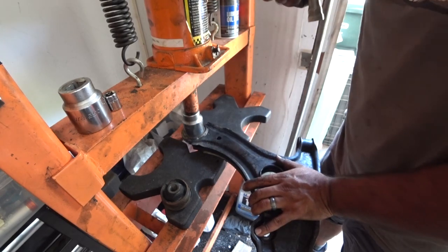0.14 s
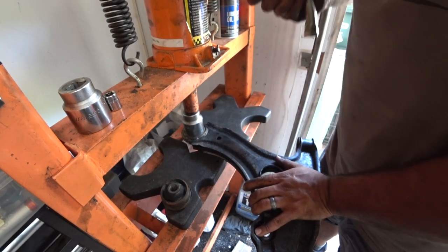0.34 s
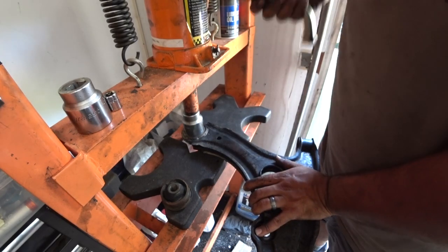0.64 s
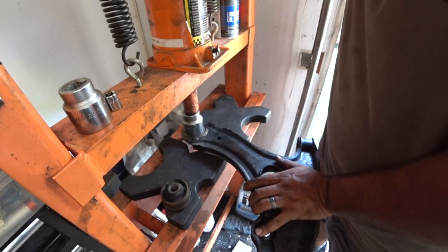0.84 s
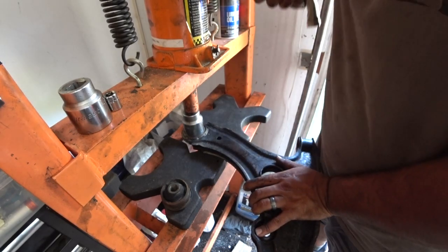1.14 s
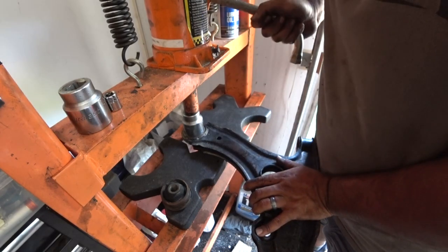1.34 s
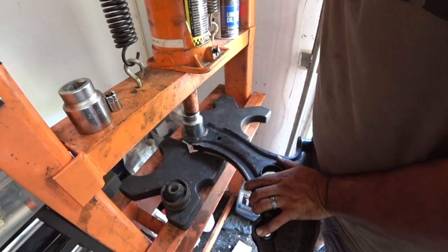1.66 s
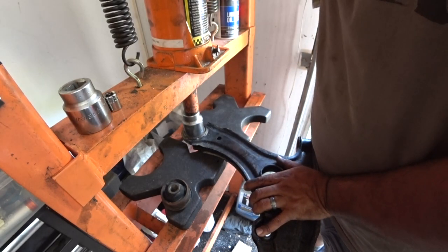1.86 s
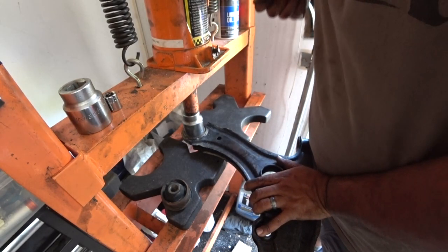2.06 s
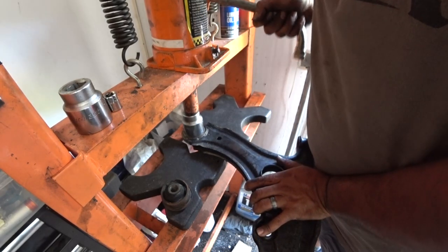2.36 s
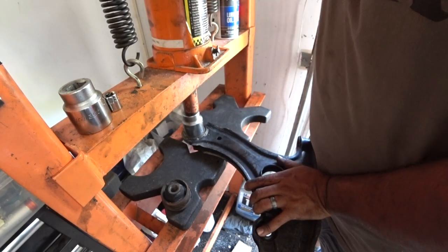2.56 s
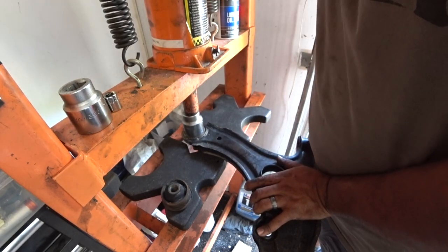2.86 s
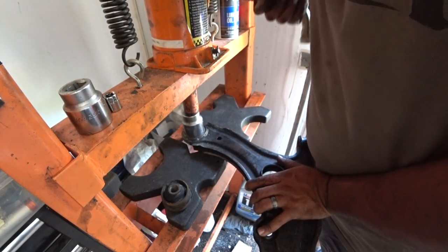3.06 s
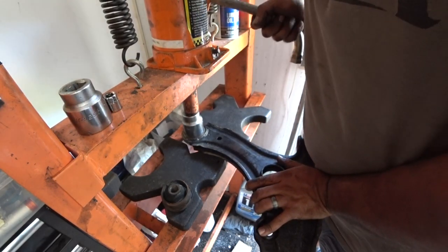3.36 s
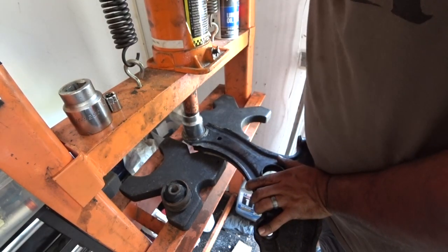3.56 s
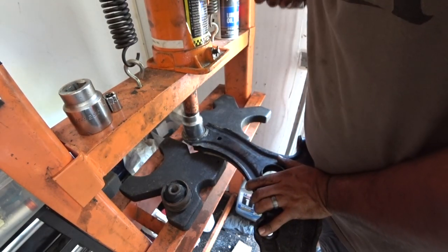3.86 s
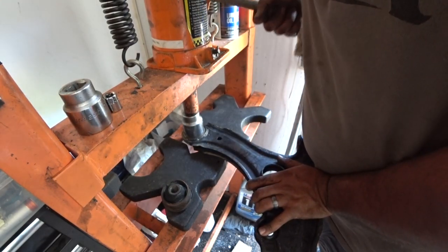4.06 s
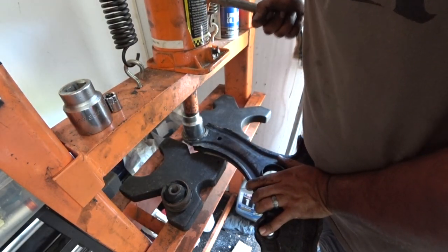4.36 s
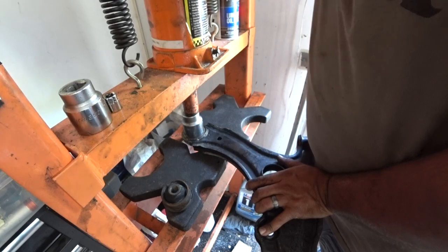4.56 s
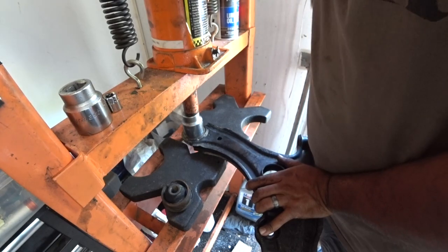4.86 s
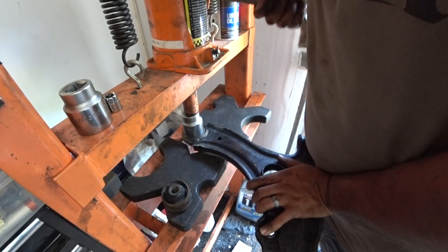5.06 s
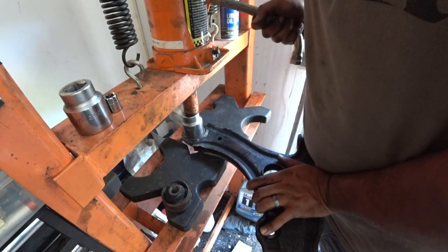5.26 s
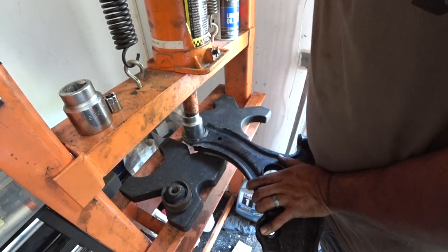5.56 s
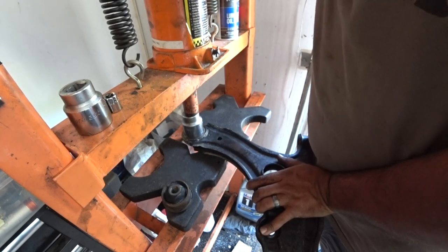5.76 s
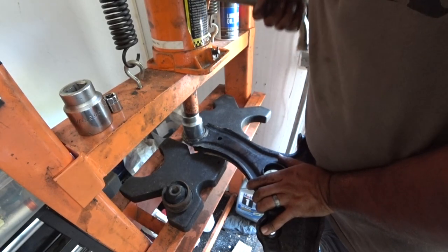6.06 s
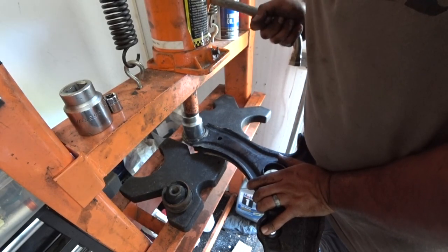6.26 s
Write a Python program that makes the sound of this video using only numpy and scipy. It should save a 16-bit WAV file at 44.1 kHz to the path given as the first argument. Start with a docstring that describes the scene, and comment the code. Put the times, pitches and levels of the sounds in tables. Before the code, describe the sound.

Quick clusters of steel clicks, bright pin snaps and duller lever thuds repeat about once a second over a faint hush, with a short room echo.

```python
"""Quick runs of metal knocks, snaps and light ticks over a quiet hush, with a ringing steel frame and a short echo.
A hand pumps the lever of a hydraulic jack on a steel press; slack in handle, pins and piston closes in knocks.
Each knock is three bands of grainy noise, a pin tone and the tones of the lever; the rattle sets the frame ringing.
Filtered noise makes the low bumps, a sliding scrape and the hush; sparse reflections make the shop's echo."""
import sys
import numpy as np
from scipy import signal
from scipy.fft import rfft, irfft
from scipy.io import wavfile
from scipy.ndimage import uniform_filter1d

SR = 44100
rng = np.random.default_rng(int(sys.argv[2]) if len(sys.argv) > 2 else 0)


def persist_wave(psi):
    """Save psi, clipped to +-1, as 16-bit WAV."""
    counts = np.round(np.clip(psi, -1, 1) * 32767).astype(np.int16)
    wavfile.write(sys.argv[1], SR, np.atleast_2d(counts).T)


N = 282681  # length in samples

# The quiet of the shop. Each row: frequency in Hz, relative level in dB.
HUSH_COLOUR = [(18, -36), (60, -15), (110, -23), (200, -9), (600, -0.5), (1100, 1), (1900, -3), (3300, -7),
               (6200, -8), (11000, -12.5)]
# How the hush changes. Each row: time in seconds, drone level in dB, hush level in dB.
HUSH_LEVELS = [(0, -64, -58), (1.2, -64, -58.5), (3.1, -69.5, -55.5), (4.3, -88, -59), (5.15, -86, -57),
               (6.3, -65, -56.5)]
# How alike left and right are in the hush. Each row: frequency in Hz, likeness (1 = the same).
HUSH_SAME = [(60, 0.8), (200, 0.38), (500, 0.055), (1400, 0.033), (4000, 0.37), (11000, 0.63)]
DRONE_HZ, DRONE_OCTAVES = 1325, 0.11  # a soft, fuzzy drone hangs in the hush

# The echo of the shop. Each row: frequency in Hz, time to fade by 60 dB in seconds.
SHOP_FADE = [(200, 0.61), (600, 0.24), (1500, 0.23), (4000, 0.14), (10000, 0.16)]
SHOP_DB = -8

# The whole press rocks on its feet. Each row: start in seconds, level in dB before the soft onset.
BUMPS = [(0.191, -52.5), (0.992, -49), (1.9, -49.5), (2.791, -43.5), (2.87, -75), (3.519, -55.5),
         (3.777, -50.5), (4.758, -51), (5.539, -63), (5.829, -42)]
BUMP_HZ, BUMP_OCTAVES = 290, 0.43
BUMP_T60, BUMP_RISE = 0.2, 0.02  # seconds: to fade by 60 dB, to rise

# Metal slides on metal as the piston moves. Each row: time in seconds, level in dB.
SLIDE_LEVELS = [(5.56, -66), (5.611, -57), (5.65, -47), (5.69, -47), (5.73, -59), (5.77, -78)]
# The tone of that scrape. Each row: frequency in Hz, relative level in dB.
SLIDE_COLOUR = [(400, -37), (1180, -6.5), (1690, -15), (2530, 3), (3680, -9), (4850, -4.5), (11000, -10)]

# Strong modes of steel frame, springs and jack body.
# Each row: frequency in Hz, relative level in dB, time to fade by 60 dB in seconds.
FRAME_MODES = [(2245, -11, .2), (2966, -15, .5), (3080, -11, .2), (3257, -9, .25), (3390, -10, .2),
               (3455, -10, .25), (3580, -24, .7), (3736, -22, .5), (3890, -14, .2), (4190, -13, .35),
               (4883, -18, .3), (5346, -17, .45), (5631, -24, .9), (6465, -11, .3), (6670, -16, .35),
               (7870, -12, .25), (8430, -21, .7), (8662, -15, .45), (10530, -20, .4)]
FRAME_DB = -17
# Many weak modes of plates and brackets between the strong ones: highest relative level, middle fade in seconds
THICKET_DB, THICKET_T60 = -24.5, 0.42

# In the five tables of contacts below, levels and fade times are starting values that knocks() adjusts.
# Knocks in the linkage. Each row: start in seconds, clack level in dB, thud against it in dB,
# tink against it in dB, pin pitch in Hz, basic rattle fade in seconds.
KNOCKS = [(.103, -45.5, -19, -4, 5500, .07), (.114, -44, -12, -1, 4430, 0.071),
          (.133, -45.5, -6, -15, 6200, .07), (.145, -22.5, -8.5, -12, 5200, 0.048),
          (.19, -22, -2.5, -8, 5830, 0.068), (0.455, -55.5, 0, -2, 3100, .07),
          (.471, -55, -11, -13, 2880, .06), (.572, -49.5, -2, -1.5, 6700, 0.078),
          (.59, -61.5, 14.5, -5, 1890, 0.097), (0.763, -42, 0, -16, 4690, .058),
          (0.93, -31, -15, -25, 4860, 0.06), (0.976, -40.5, 8, 1, 3000, 0.11),
          (.991, -22, -4, -0.5, 4960, 0.08), (1.268, -52.5, 0, -10.5, 1910, .051),
          (1.553, -36, -7.5, -9, 2740, 0.07), (1.589, -45, 12.5, 1.2, 2920, 0.088),
          (1.622, -24, -6, -3.5, 6500, 0.055), (1.666, -28.5, 0.5, 3, 3050, 0.032),
          (1.798, -47, -1, -9, 3340, .063), (1.813, -40.5, -8, -5, 5800, .042),
          (1.827, -37.5, -11, -12, 3150, 0.07), (1.894, -23, -5.5, -3, 3260, 0.077),
          (2.459, -42, -31, -25, 6030, .09), (2.466, -25, -6.5, -2, 3010, 0.067),
          (2.48, -25, -6, 1.5, 6410, 0.11), (2.518, -19, -9, -33, 4100, 0.029),
          (2.724, -21.5, -9.5, -9, 3460, 0.062), (2.752, -35.5, -1, -4, 2880, 0.068),
          (2.767, -22.5, -6.5, -7.5, 3390, 0.084), (2.868, -66, 17.5, -5, 1900, 0.076),
          (3.129, -51.5, -15, -2.2, 6800, 0.095), (3.224, -35.5, -9, 11, 10700, 0.04),
          (3.335, -43.5, -6, -10.5, 3000, 0.034), (3.435, -58, -6, -14, 2400, .1),
          (3.462, -35.5, 3, -13, 3330, 0.09), (3.475, -21.5, -11.5, -7.5, 5980, 0.073),
          (3.517, -36.5, 3, 12, 10500, 0.064), (3.54, -34.5, -5, -3, 2210, 0.051),
          (3.773, -26, -13, -10, 3260, 0.083), (3.797, -45, -12, -2, 10070, 0.071),
          (4.4, -53.5, 6, -31, 1940, 0.056), (4.453, -25.5, -9, -7, 6540, 0.031),
          (4.478, -21, -11, -5, 6440, 0.087), (4.512, -21.5, -7.5, -4, 3800, 0.03),
          (4.659, -53, 4, 1, 5200, 0.11), (4.702, -50.5, 2, 2, 7300, 0.096),
          (4.772, -25, -12.5, -5.5, 3120, 0.082), (5.045, -57, -18, -1.2, 3450, .051),
          (5.276, -49, -11, -2, 2030, 0.061), (5.463, -38, -6.5, -14, 2860, .062),
          (5.52, -24.5, -8.5, -5, 3650, 0.11), (5.539, -29.5, -3, 9, 6570, 0.066),
          (5.557, -26.5, -9.5, -28, 3820, 0.047), (5.808, -28.5, -3, 3, 4930, 0.048),
          (5.819, -17, -6.5, -2.5, 3360, 0.065)]
# The lever meets its stop at the end of each stroke.
# Each row: start in seconds, thud level in dB, clack and pin against the thud in dB.
STOPS = [(1.399, -22, -3.5), (2.256, -22.5, -2), (3.253, -23.5, -1), (4.194, -24.5, -10),
         (5.249, -25.5, -8.5), (6.215, -23.5, -1)]
STOP_PIN_HZ, STOP_T60 = 3590, 0.054  # pin pitch, basic fade in seconds
STOP_TINK_DB, STOP_TINK_SLOPE = -12.5, 1.4  # tink against thud, and dB more per dB of clack against thud
# The pivot pin snaps across its hole. Each row: start in seconds, pin level in dB, pin pitch in Hz,
# thud against the pin in dB, basic rattle fade in seconds.
SNAPS = [(.167, -14, 4550, -28, 0.083), (.702, -21, 4600, -12, 0.06), (.722, -14.5, 5500, -9.5, 0.037),
         (0.7437, -17.5, 3940, -28, 0.03), (0.7482, -9.5, 4680, -24.5, 0.03), (.95, -16, 4590, -21.5, 0.09),
         (1.649, -13.5, 4500, -13, 0.057), (1.861, -16, 4600, -23, 0.074), (3.753, -15, 4615, -17.5, 0.072),
         (4.745, -16, 4760, -19, 0.066), (5.781, -11, 4700, -18.5, 0.049), (5.787, -23, 4200, -10, 0.13)]
SNAP_CLACK_DB, SNAP_TINK_DB = -5, -10  # against the pin
# Slack is taken up in a drawn-out rattle. Each row: start in seconds, clack level in dB,
# brightness in dB (tink up and thud down), pin pitch in Hz.
SLACK = [(0.647, -57, -6, 6470), (.683, -40.5, -5.5, 2850), (.713, -30.5, 3.5, 6370),
         (.915, -43.5, 1, 5800), (1.598, -28, 1, 2990), (1.844, -41.5, -1.5, 7340), (2.443, -46, -5, 2440),
         (2.703, -36, -1, 2780), (3.497, -28, -1, 8300), (3.695, -42.5, 3, 5900), (3.709, -36.5, 3, 3120),
         (3.726, -35.5, -4, 6440), (4.444, -36.5, 3, 2540), (4.463, -33, 8.5, 6450),
         (5.107, -63.5, 18, 6540), (5.495, -39, -2, 2250), (5.762, -44, -8, 3320), (6.003, -55, 9, 5750),
         (6.094, -60, 13.5, 6600)]
SLACK_THUD_DB, SLACK_TINK_DB, SLACK_PIN_DB = -7.5, -4, -4  # against the clack
SLACK_T60 = 0.18  # basic fade in seconds
# Light ticks of springs and hooks. Each row: start in seconds, tink level in dB, pitch in Hz.
TICKS = [(.077, -50, 8200), (.427, -52.5, 6670), (1.188, -47, 5700), (1.197, -41, 6800),
         (1.245, -50.5, 5270), (1.284, -48.5, 6800), (1.439, -43, 6480), (2.045, -51, 6700),
         (2.142, -51, 6840), (2.201, -43.5, 6800), (2.236, -44, 6640), (2.415, -49, 6790),
         (2.965, -45, 5150), (2.981, -48.5, 6800), (3.011, -46, 6960), (3.023, -35.5, 10700),
         (3.065, -40, 6980), (3.119, -38.5, 10500), (3.209, -38, 9960), (3.356, -50, 10190),
         (3.664, -49, 8600), (4.045, -57.5, 6740), (4.099, -52, 8100), (4.215, -39.5, 7700),
         (4.974, -57, 5780), (5.058, -48, 5900)]
TICK_THUD_DB, TICK_CLACK_DB, TICK_PIN_DB = -28, -17, -10  # against the tink
TICK_T60 = 0.077  # basic fade in seconds

# How loud pins ring against the clack in KNOCKS. Each row: frequency in Hz, level in dB.
PIN_LEVEL = [(2000, 6.5), (3000, -2), (5000, -7.5), (6400, -2), (10000, 6)]
# How long pins ring for their rattle. Each row: frequency in Hz, fade-time factor.
PIN_RING = [(2000, 0.66), (4600, 0.71), (5900, 1.7), (6450, 2.44), (6900, 1.2), (10000, 1.16)]
# The tone of a thud. Each row: frequency in Hz, relative level in dB.
THUD_COLOUR = [(30, -37), (150, -33.5), (300, -20), (550, -7), (900, -6), (1200, 0), (1520, -17),
               (1800, -9.5), (2400, -18), (4000, -52)]
CLACK_BAND, TINK_BAND = (3290, 0.65), (8260, 0.7)  # centre in Hz, width in octaves
# Thud, clack and tink in that order. Each row: fade-time factor, rise in seconds.
PARTS = [(1.92, 0.005), (1.25, 0.0011), (1.295, 0.00086)]
# The lever and its socket, rung by the thud of each knock. Each row: frequency in Hz, relative level
# after a dull knock in dB, the same after a bright knock in dB, time to fade by 60 dB in seconds.
LEVER_MODES = [(619, -24, -20, .5), (822, -9, -11, .13), (985, -14, -13, .28), (1071, -14, -15, .2),
               (1170, -11, -7, .13), (1273, -21, -11, .5), (1357, -6, -12, .3), (1385, -6, -11, .33),
               (1483, -9, -9, .1), (1565, 3, -11, .15), (1640, 1, -9, .07), (1816, -19, -12, .45)]
LEVER_DB, LEVER_SPREAD_DB = -9, 2.2  # level against the thud, random spread of each mode

# How the jack sits between the ears. Each row: frequency in Hz, left minus right in dB,
# left lead in radians.
LEAN = [(300, -.4, .25), (2000, -.5, .35), (5000, -1.5, .1), (10000, -1.9, .1)]
BEND = 0.03  # the microphone is slightly lopsided
CEILING = 1.5  # and rounds off the loudest peaks
EDGE_HZ = 11030  # top of the band


def gain_of(db):
    """Turns decibels into gain."""
    return 10 ** (np.asarray(db) / 20)


def evened(x):
    """Scales a sound to an average (rms) level of 1."""
    return x / np.sqrt(np.mean(x ** 2) + 1e-20)


def read(points, hz):
    """Reads between table rows on a log-frequency axis."""
    f, value = np.transpose(points)
    return np.interp(np.log(hz + 1), np.log(f + 1), value)


def coloured(x, db_points):
    """Shapes the spectrum of x along its last axis."""
    hz = np.fft.rfftfreq(x.shape[-1], 1 / SR)
    return irfft(rfft(x) * gain_of(read(db_points, hz)), x.shape[-1])


def bell(hz, centre_hz, octaves):
    """A smooth band on a log-frequency axis."""
    return np.exp(-.5 * (np.log2((hz + 1) / centre_hz) / octaves) ** 2)


def hush():
    """The quiet of the shop: random short-time spectra with faint drifting patches."""
    frames, hz = N // 256 + 5, np.fft.rfftfreq(1024, 1 / SR)
    a, b, c, d, patches = rng.standard_normal((frames, 513, 5)).T
    patches = uniform_filter1d(patches, size=14, axis=0)
    patches = evened(uniform_filter1d(patches, size=12, axis=1))
    same = np.clip(read(HUSH_SAME, hz), -1, 1)[:, None]
    left, other = a + 1j * b, c + 1j * d
    right = same * left + np.sqrt(1 - same ** 2) * other
    spectra = np.array([left, right]) * gain_of(read(HUSH_COLOUR, hz)[:, None] + 2.2 * patches)

    s, *level_db = np.transpose(HUSH_LEVELS)
    bands = (bell(hz, DRONE_HZ, DRONE_OCTAVES)[:, None], 1)  # drone, then the whole hush
    out = np.zeros((2, N))
    for db, band in zip(level_db, bands):
        sound = signal.istft(spectra * band, nperseg=1024, noverlap=768)[1][:, :N]
        out += gain_of(np.interp(np.arange(N) / SR, s, db)) * evened(sound)
    return out


def shop(x):
    """The echo: sparse reflections of random sign, each band dying at its own speed."""
    taps = np.zeros((2, SR // 2))
    # one reflection at a random place in every 20 samples
    at = np.arange(120, SR // 2 - 20, 20) + rng.integers(0, 20, (2, (SR // 2 - 121) // 20))
    np.put_along_axis(taps, at, rng.choice([-1., 1.], at.shape), 1)
    taps[1] = .25 * taps[0] + .95 * taps[1]  # close microphones share part of the echo
    hz, t, spectra = signal.stft(taps, SR, nperseg=256)
    fade = gain_of(-60 * t / read(SHOP_FADE, hz)[:, None])
    tail = signal.istft(spectra * fade, SR, nperseg=256)[1]
    tail /= np.linalg.norm(tail, axis=1, keepdims=True)
    return gain_of(SHOP_DB) * signal.fftconvolve(x[None], tail, axes=1)[:, :N]


def bumps():
    """Low, dull shudders of the frame against the floor: low noise that swells and fades."""
    t, hz = np.arange(N) / SR, np.fft.rfftfreq(N, 1 / SR)
    low = irfft(rfft(rng.standard_normal(N)) * bell(hz, BUMP_HZ, BUMP_OCTAVES), N)
    swell = np.zeros(N)
    for s, db in BUMPS:
        since = np.maximum(t - s, 0)
        swell += gain_of(db - 60 * since / BUMP_T60) * (1 - np.exp(-since / BUMP_RISE))
    return evened(low) * swell


def slide():
    """Metal slides on metal: a short gritty scrape of unevenly strong noise."""
    s, db = np.transpose(SLIDE_LEVELS)
    uneven = evened(uniform_filter1d(rng.standard_normal(N), size=80))
    grit = rng.standard_normal(N) * gain_of(0.99 * uneven)
    level = gain_of(np.interp(np.arange(N) / SR, s, db, -140, -140))
    return level * evened(coloured(grit, SLIDE_COLOUR))


def frame(x):
    """The rattle shakes the steel, whose modes ring on; each microphone hears them at its own phase."""
    t, luck = np.arange(SR) / SR, rng.random((170, 3))
    thicket = [(1900 * 9.4 ** a, THICKET_DB - 8 * b, THICKET_T60 * (.5 + c)) for a, b, c in luck]
    modes = FRAME_MODES + thicket
    # phases in turns: mostly shared by both sides
    turns = rng.random((len(modes), 1)) + 0.078 * rng.standard_normal((len(modes), 2))
    ring = np.zeros((2, SR))
    for (hz, db, t60), turn in zip(modes, turns):
        ring += gain_of(db - 60 * t / t60) * np.sin(2 * np.pi * (hz * t + turn[:, None]))
    ring /= np.linalg.norm(ring[0])
    return gain_of(FRAME_DB) * signal.fftconvolve(x[None], ring, axes=1)[:, :N]


def blows():
    """Lists every contact: start s, thud dB, clack dB, tink dB, pin pitch Hz, pin dB, basic fade s."""
    out = []
    for s, db, sharp in STOPS:
        tink_db = db + STOP_TINK_DB + STOP_TINK_SLOPE * sharp
        out.append((s, db, db + sharp, tink_db, STOP_PIN_HZ, db + sharp, STOP_T60))
    for s, db, hz, thud, t60 in SNAPS:
        out.append((s, db + thud, db + SNAP_CLACK_DB, db + SNAP_TINK_DB, hz, db, t60))
    for s, db, thud, tink, hz, t60 in KNOCKS:
        out.append((s, db + thud, db, db + tink, hz, db + read(PIN_LEVEL, hz), t60))
    for s, db, bright, hz in SLACK:
        thud_db, tink_db = db + SLACK_THUD_DB - bright, db + SLACK_TINK_DB + bright
        out.append((s, thud_db, db, tink_db, hz, db + SLACK_PIN_DB, SLACK_T60))
    for s, db, hz in TICKS:
        out.append((s, db + TICK_THUD_DB, db + TICK_CLACK_DB, db, hz, db + TICK_PIN_DB, TICK_T60))
    return out


def knocks():
    """Each contact: three bands of grainy rattle, the short ring of one pin and the tones of the lever."""
    size = 16384  # samples of lever ring; rattle and pin take half of it
    t, hz = np.arange(size) / SR, np.fft.rfftfreq(size // 2, 1 / SR)
    rattle, rings = np.zeros((2, N + size))
    colours = [gain_of(read(THUD_COLOUR, hz)), bell(hz, *CLACK_BAND), bell(hz, *TINK_BAND)]
    lever_hz, dull_db, bright_db, lever_t60 = np.transpose(LEVER_MODES)[:, :, None]
    lever = gain_of(-60 * t / lever_t60) * np.sin(2 * np.pi * lever_hz * t)
    lever *= 1 - np.exp(-t / .0012)

    u = t[:size // 2]
    first_hit = 1 + 2.08 * np.exp(-u / 0.0017)  # the first contact is harder than the rattle after it
    for s, *part_db, pin_hz, pin_db, t60 in blows():
        noise = rng.standard_normal((3, len(u)))
        t60, at = max(t60, .005), round(s * SR)
        short, long = slice(at, at + len(u)), slice(at, at + size)

        # loose parts bounce unevenly after the first contact
        bounce = evened(uniform_filter1d(noise[1], size=50)) * (1 - np.exp(-u / 0.0025))
        grit = rfft(noise[0] * gain_of(3.65 * bounce))
        for db, colour, (slower, rise) in zip(part_db, colours, PARTS):
            fade = gain_of(db - 4 - 60 * u / (slower * t60)) * (1 - np.exp(-u / rise))
            rattle[short] += fade * first_hit * evened(irfft(grit * colour))

        pin_t60 = 0.31 * t60 * abs(read(PIN_RING, pin_hz))
        fade = gain_of(pin_db + 7.0 - 60 * u / pin_t60) * (1 - np.exp(-u / 0.0005))
        rings[short] += fade * np.sin(2 * np.pi * pin_hz * u)

        # the more thud against clack, the duller the lever's tone; no two blows land quite alike
        dull = np.clip(1.6 + (part_db[0] - part_db[1]) / 5, 0, 1)
        mode_db = (dull * dull_db + (1 - dull) * bright_db)[:, 0]
        mode_db += LEVER_SPREAD_DB * noise[2, :len(LEVER_MODES)]
        signs = np.sign(noise[2, -len(LEVER_MODES):])
        rings[long] += (gain_of(part_db[0] + LEVER_DB + mode_db) * signs) @ lever
    return rattle[:N], rings[:N]


def scene():
    """The jack stands a little to the right; frame and shop answer it over the hush."""
    rattle, rings = knocks()
    jack = rattle + rings + slide() + bumps()
    hz, (at_hz, lean_db, lead) = np.fft.rfftfreq(N, 1 / SR), np.transpose(LEAN)
    # half of each difference goes to the left, the opposite half to the right
    half = gain_of(np.interp(hz, at_hz, lean_db) / 2) * np.exp(.5j * np.interp(hz, at_hz, lead))
    near = irfft(rfft(jack + frame(rattle)) * np.array([half, 1 / half]), N)
    return near + shop(jack) + hush()


def record(dry):
    """Loud clicks bend the microphone, which also drops the bass; then the top is cut off."""
    bent = CEILING * np.tanh((dry + BEND * dry ** 2) / CEILING)
    thin = signal.sosfilt(signal.butter(1, 120, "high", fs=SR, output="sos"), bent)
    low_pass = signal.firwin(301, EDGE_HZ, window=("kaiser", 3), fs=SR)
    return signal.oaconvolve(thin, low_pass[None], "same")


dry = scene()
out = record(dry)
persist_wave(out)
```